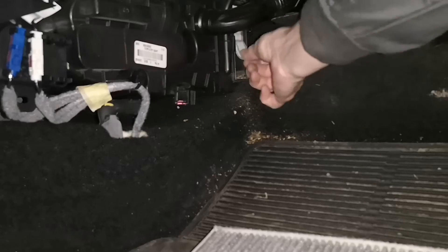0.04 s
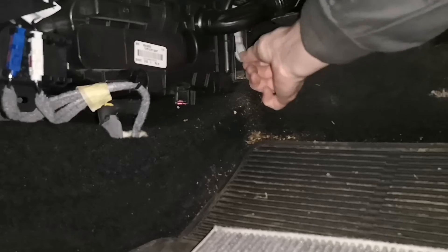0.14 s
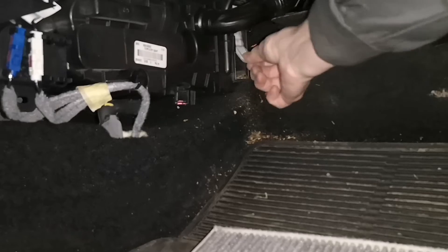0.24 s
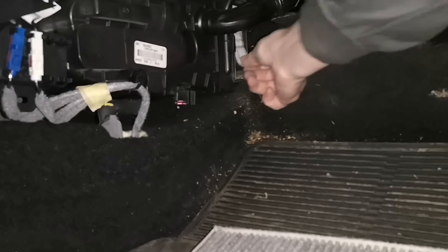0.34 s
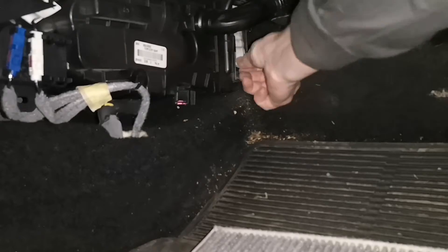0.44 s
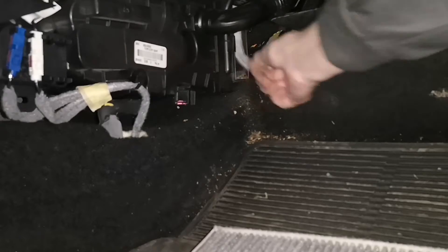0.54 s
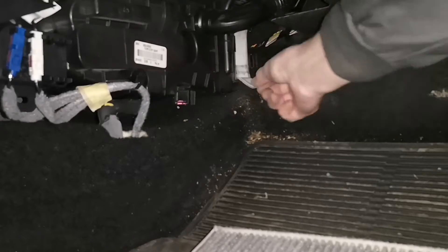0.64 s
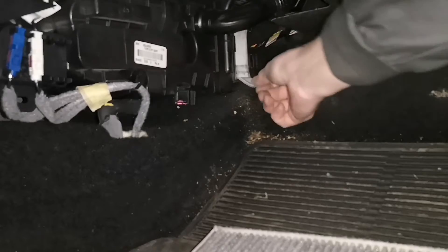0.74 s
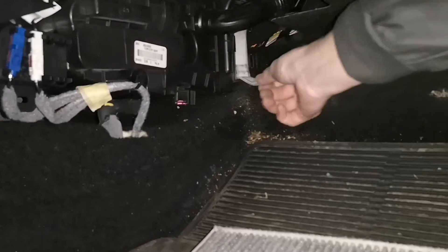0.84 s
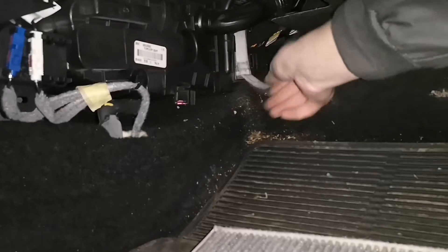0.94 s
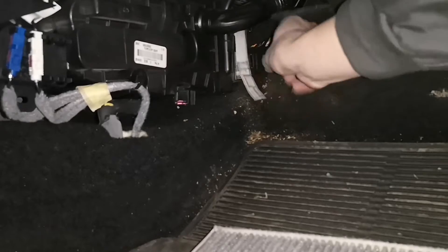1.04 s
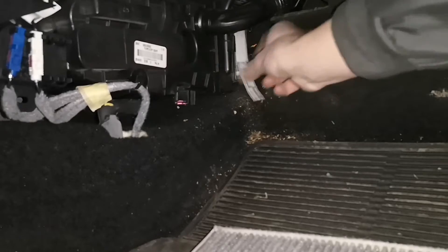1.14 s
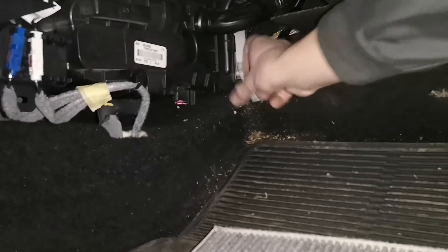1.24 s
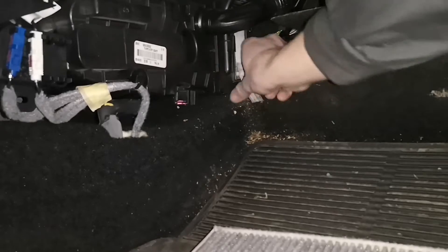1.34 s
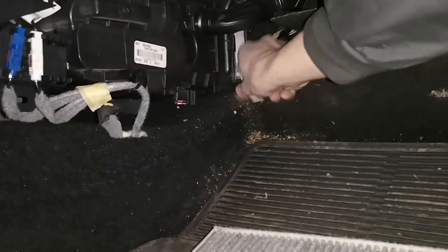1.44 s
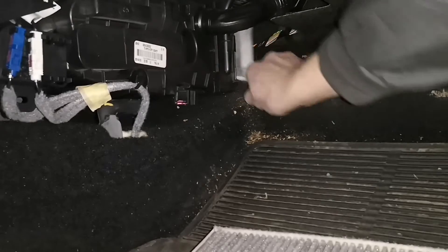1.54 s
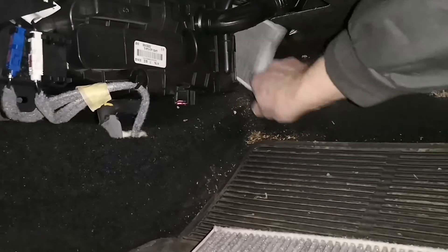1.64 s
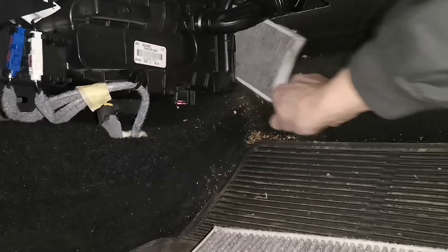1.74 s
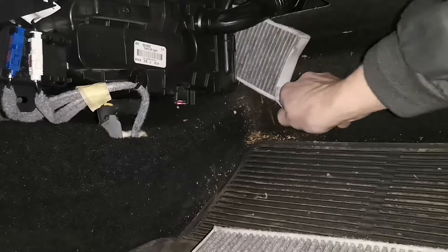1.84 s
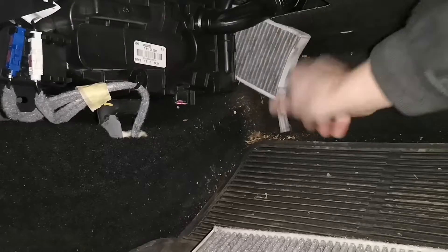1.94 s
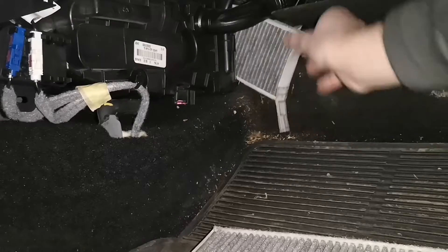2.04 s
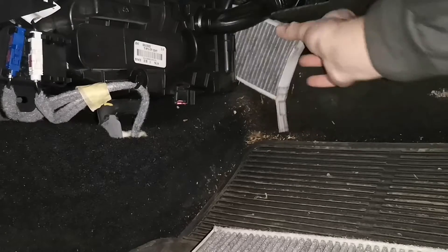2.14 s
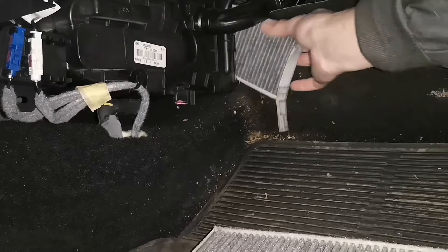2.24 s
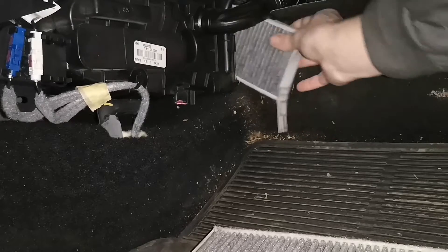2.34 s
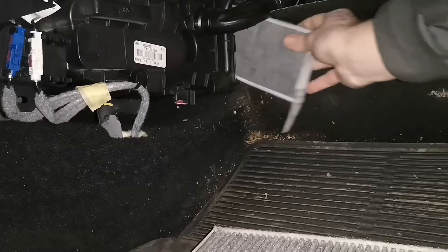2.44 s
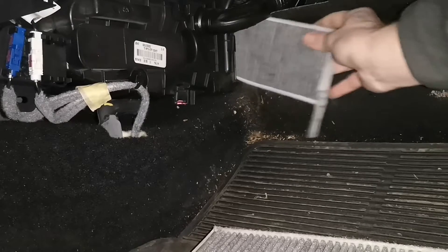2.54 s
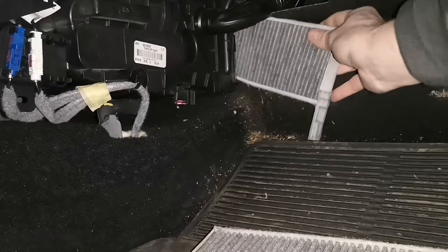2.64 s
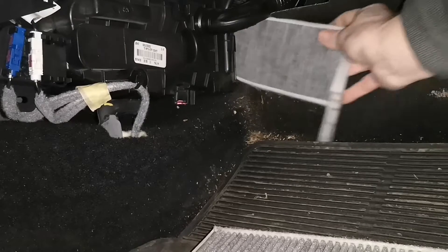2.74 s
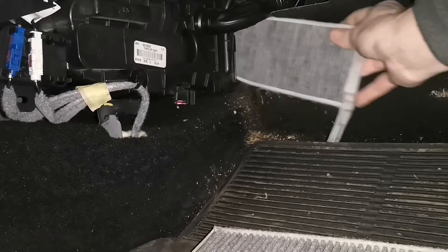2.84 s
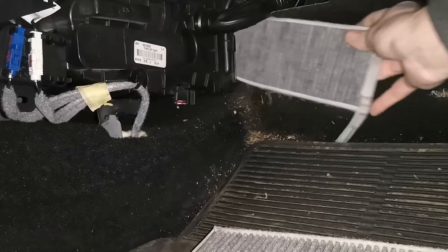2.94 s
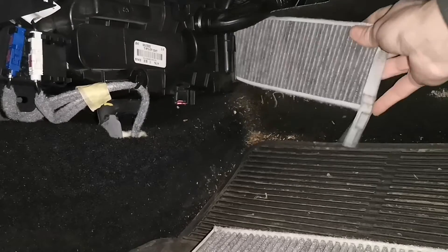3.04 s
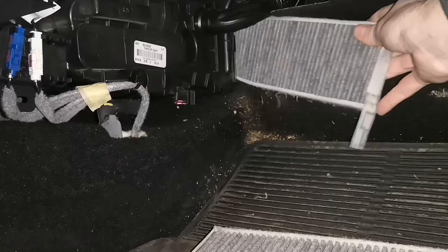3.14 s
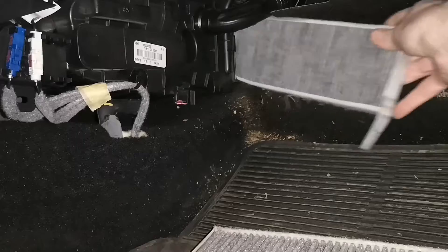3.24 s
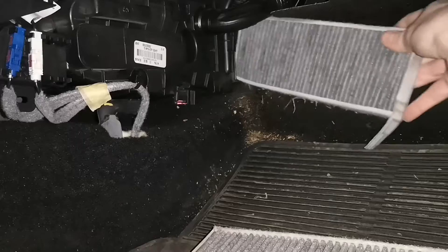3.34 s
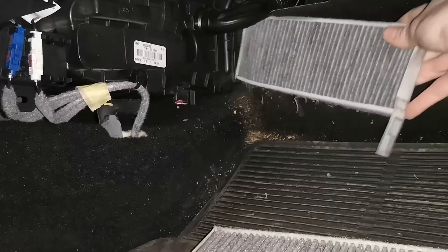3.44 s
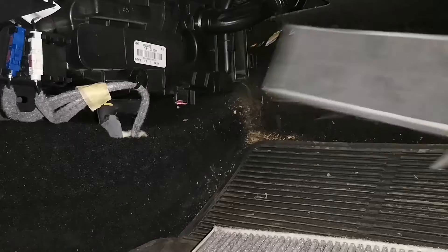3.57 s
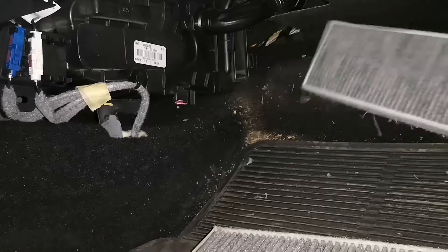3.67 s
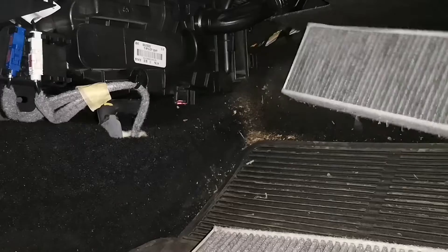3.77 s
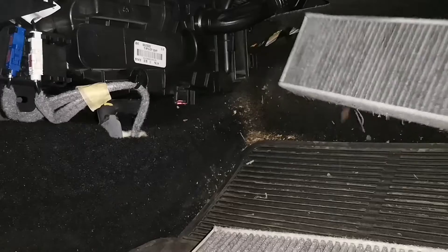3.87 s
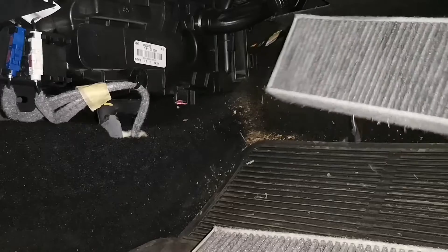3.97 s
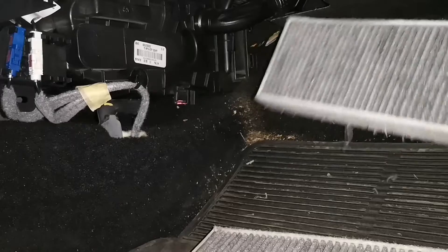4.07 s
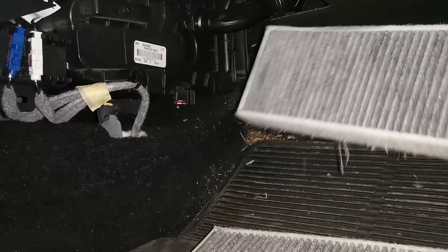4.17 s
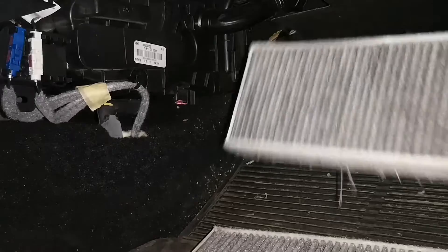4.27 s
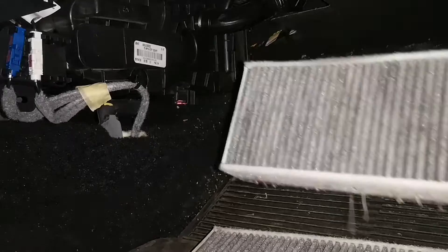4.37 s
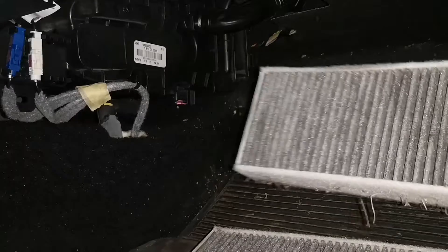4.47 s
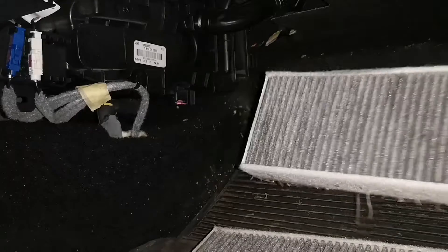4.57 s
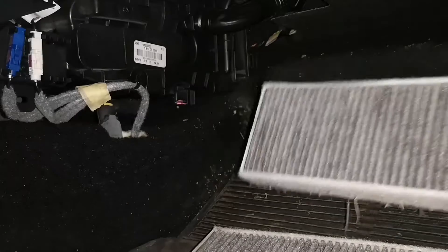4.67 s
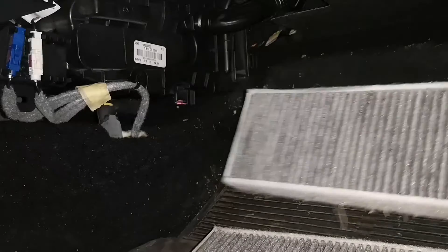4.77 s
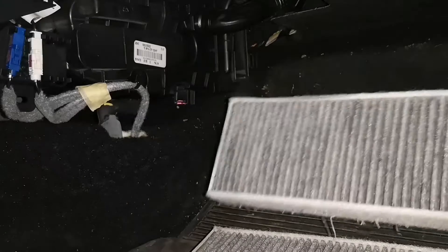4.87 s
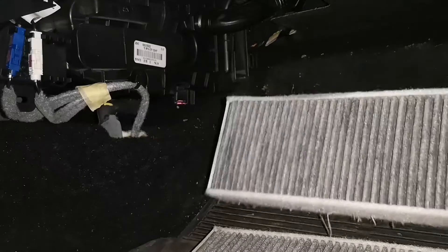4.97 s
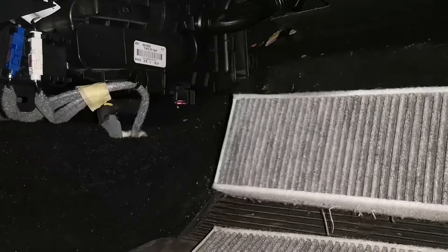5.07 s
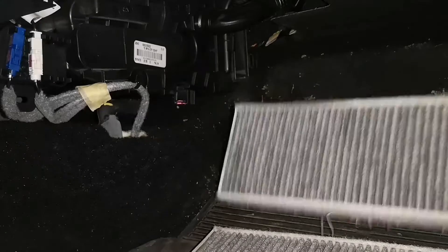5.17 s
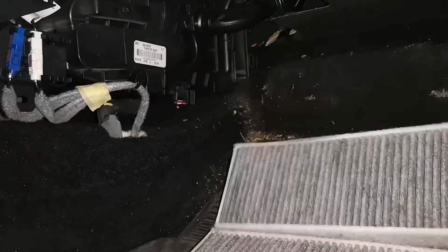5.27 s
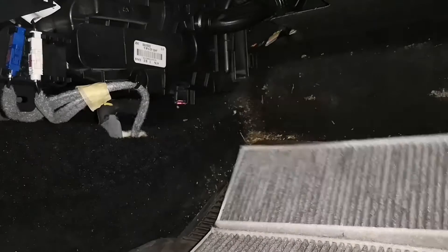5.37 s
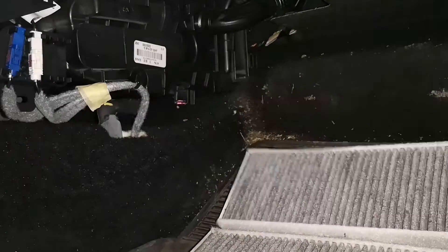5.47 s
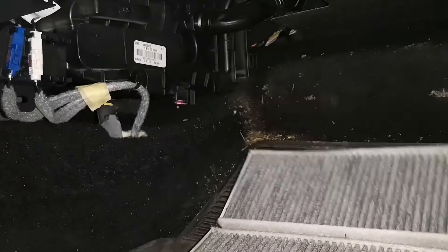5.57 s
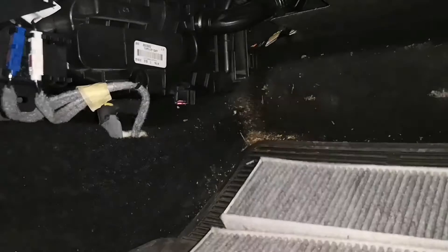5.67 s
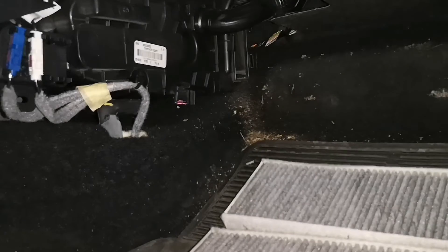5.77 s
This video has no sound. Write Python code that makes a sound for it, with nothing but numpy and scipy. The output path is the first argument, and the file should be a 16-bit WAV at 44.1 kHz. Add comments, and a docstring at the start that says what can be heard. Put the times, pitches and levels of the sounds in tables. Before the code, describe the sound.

Close up in a cramped car footwell, a hand tugs a pleated filter from a plastic slot: short scratchy rasps, a sharp cluster of clicks, then longer hissing, drumming scrapes. The frame pops free with a low thump, the sleeve swishes quietly, and the filter settles softly on a rubber mat.

```python
"""The listener first hears a pleated cabin filter rasp and tick as it is tugged from its plastic housing
in a car footwell; it is then laid on the rubber mat. Fibres stick and slip on the slot: these impulses
excite the housing's modes and hiss in the pleats. The frame bumps, snaps free and squeaks.
A sleeve swishes as the arm moves, over the faint noise of the parked car.
A close phone with two ports hears it all with the short, dense reflections of the footwell."""
import sys
import numpy as np
from scipy import signal
from scipy.fft import rfft, irfft
from scipy.io import wavfile
from scipy.ndimage import uniform_filter1d

SR = 44100
rng = np.random.default_rng(int(sys.argv[2]) if len(sys.argv) > 2 else 0)


def to_wav(sig):
    """Store sig (one row per channel, or 1-D mono) as 16-bit WAV at the path in sys.argv[1].

    Samples outside -1..1 are clipped; the rate is SR.
    """
    pcm = np.clip(np.atleast_2d(sig), -1, 1) * 32767
    pcm = np.round(pcm).astype(np.int16)
    wavfile.write(sys.argv[1], SR, pcm.T)  # frames by channels


N = 256220
TIME = np.arange(N) / SR  # s

# where the filter bears on the slot: t/s, f/Hz of the strongest ring, pleat drumming re rasp/dB
CONTACT_PATH = [(.7, 1130, -3.5), (1.3, 2020, -13.5), (1.6, 1900, 5), (1.85, 1400, 5), (2.7, 1560, 4.5),
                (3.25, 1620, 6.5), (3.44, 1480, -0.5), (3.8, 1920, -7), (5.3, 1750, -5)]
# spectral outline of the drumming pleats: f/Hz, relative level/dB
DRUM_SPECTRUM = [(130, -25.5), (300, 7.5), (560, 7.5), (850, -3.5), (1800, -58.5)]
# spectral outline of the hissing pleats: f/Hz, relative level/dB
PLEAT_SPECTRUM = [(400, -17.5), (1000, -12.5), (2200, -5), (3400, -8), (4300, -5), (6000, -5), (7900, -5),
                  (8800, -10.5), (11000, -12.5), (15000, -25.5)]
# spectral outline of the handling rumble: f/Hz, relative level/dB
RUMBLE_SPECTRUM = [(15, -8), (30, 0.5), (75, 4.5), (200, -9.5), (300, -23), (500, -32.5), (1500, -70.5)]


def rubbing(count=3):
    """Stick-slip friction: pleats catching at a few shifting spots of the slot rasp, hiss and drum."""
    rasp_gain, hiss_gain, rumble_gain = pulls()
    contact_hz, drum_db = curves(CONTACT_PATH)
    catch = walk(rate=67)
    # passing pleats catch densely; the bare frame crackles coarsely
    density = undb(np.minimum(drum_db, 0))
    rumble = unit(colour(slips(rate=1700, spread_db=3.0), RUMBLE_SPECTRUM))
    out = footwell(rumble * rumble_gain)
    for share in spots(count):
        edge = slips(rate=330 * density, spread_db=4.5) / np.sqrt(density)  # equal power at any density
        spot_hz = contact_hz * 2 ** (.35 * walk(rate=30))
        rasp = unit(housing(edge, spot_hz)) * rasp_gain * undb(2 * catch)
        drum = unit(colour(edge, DRUM_SPECTRUM)) * rasp_gain * undb(drum_db + 2.5 * catch)
        fibres = slips(rate=1600, spread_db=3.5)
        hiss = unit(colour(fibres, PLEAT_SPECTRUM)) * hiss_gain * undb(1.86 * catch)
        out = out + footwell(share * (rasp + drum + hiss))
    return out


# scrapes on the slot, the last on the mat: t/s, length/s, frame rasp level/dB, pleat hiss level/dB,
# rumble level/dB, growth over the stroke/dB
SCRAPE_STROKES = [(0.089, 0.086, -44.5, -49, -39.5, -1.5), (0.282, 0.055, -53, -66, -48, 19.5),
                  (0.329, 0.11, -57, -61, -42, -1.5), (0.486, 0.078, -49.5, -52, -45.5, 4.5),
                  (0.622, 0.046, -47.5, -50, -42, 8), (0.66, 0.098, -38.5, -46, -25.5, 5),
                  (1.233, 0.33, -62, -55.5, -45.5, -4), (1.475, 0.33, -57, -51, -45, 8.5),
                  (1.56, 0.056, -72, -43.5, -66, 8), (1.758, 0.16, -48, -42.5, -30, -1),
                  (2.135, 0.22, -59, -55, -35.5, 2), (2.495, 0.21, -52, -43, -38, 8.5),
                  (2.696, 0.14, -54, -52, -39.5, -3), (2.822, 0.29, -49.5, -46.5, -41, -0.5),
                  (3.096, 0.33, -55.5, -59, -39.5, -5.5), (3.347, 0.092, -45.5, -49.5, -38.5, 10.5),
                  (3.458, 0.074, -46, -49, -37.5, -1.5), (3.566, 0.095, -51.5, -51.5, -34.5, 4),
                  (3.682, 0.19, -54, -51, -37, -8.5), (5.06, 0.21, -68, -70, -55.5, 8.5),
                  (5.233, 0.09, -55.5, -56, -55, 8.5), (5.326, 0.25, -57, -54.5, -45, -5.5)]


def pulls():
    """Superposition of powers: the overlapping scrapes give the gains of rasp, hiss and rumble."""
    power = np.zeros((3, N))
    for s, length, rasp_db, hiss_db, rumble_db, growth_db in SCRAPE_STROKES:
        drag = stroke(length, growth_db, SCRAPE_RELEASE_S + RELEASE_SHARE * length)
        shake = stroke(length, growth_db, RUMBLE_RELEASE_S + RELEASE_SHARE * length)
        gains = [undb(rasp_db) * drag, undb(hiss_db) * drag, undb(rumble_db) * shake]
        add(power, s, np.square(gains))
    return np.sqrt(power)


# a longer pull starts and ends more gently: fixed times in s plus shares of its length
SCRAPE_ATTACK_S, ATTACK_SHARE = 0.018, 0.16
SCRAPE_RELEASE_S, RUMBLE_RELEASE_S, RELEASE_SHARE = 0.012, 0.032, 0.13


def stroke(length, growth_db, release_s, size=32768):
    """Envelope of one pull: grip builds up, changes evenly in dB, then decays exponentially at the stop."""
    age = TIME[:size]
    attack_s = SCRAPE_ATTACK_S + ATTACK_SHARE * length
    grip = np.sin(np.pi / 2 * np.minimum(age / attack_s, 1)) ** 2
    growth = undb(growth_db * (np.minimum(age / length, 1) - .5))
    release = np.exp(-np.maximum(age - length, 0) / release_s)
    return grip * growth * release


# modes of the plastic housing before detuning and damping: f/Hz, width/Hz, relative level/dB
HOUSING_MODES = [(367, 36, 2.5), (506, 250, 6), (607, 110, 10.5), (1040, 453, 0), (1418, 175, 2.5),
                 (1730, 220, 1.5), (2220, 284, 3), (2505, 296, 5), (2910, 500, 1.5), (4840, 1630, -3.5)]


def housing(force, contact_hz, damping=1, octaves=0.73, detune=0.056):
    """Modal resonance: broad, damped modes ring most near the contact pitch, slightly shifted each time."""
    out = 0
    for k, (hz, width, db) in enumerate(HOUSING_MODES):
        hz = hz * np.exp(detune * rng.standard_normal())
        coupling = 1 / (1 + (np.log2(hz / contact_hz) / octaves) ** 2)
        resonance = signal.iirpeak(hz, hz / (width * damping), SR)
        sign = (-1) ** k  # neighbouring modes move in opposition
        out = out + sign * undb(db) * signal.lfilter(*resonance, force * coupling)
    return out


def slips(rate, spread_db):
    """Stick-slip as a random impulse train (rate per s): fibres let go with sizes spread in dB, capped."""
    happens = rng.random(N) < rate / SR
    size = undb(spread_db * np.minimum(rng.standard_normal(N), 2))
    return happens * size * rng.choice([-1, 1], N)


def spots(count, rate=4.084):
    """Load sharing: the contact wanders among a few spots whose powers always sum to one."""
    load = undb([6 * walk(rate) for _ in range(count)])
    return load / np.linalg.norm(load, axis=0)


# snaps and ticks of the frame: t/s, plastic knock level/dB, paper crack level/dB, burst decay/s,
# f/Hz of the strongest ring
FRAME_SNAPS = [(0.116, -45.5, -54.5, 0.0059, 1360), (.144, -51, -72, 0.0052, 1000),
               (0.7389, -41, -45, 0.0065, 900), (0.747, -40, -53, 0.0057, 1540),
               (0.7598, -36, -58, 0.0018, 1820), (0.7637, -35, -71, 0.0049, 970),
               (1.383, -53.5, -66, 0.0064, 630), (1.7766, -53, -57, 0.0039, 650),
               (1.7908, -57, -45.5, 0.0085, 900), (1.821, -49, -47.5, 0.006, 1250),
               (1.886, -46.5, -44, 0.0087, 1400), (3.2226, -50.5, -54, 0.0041, 890),
               (3.418, -45.5, -54, 0.012, 1270), (3.525, -46.5, -44, 0.0065, 2270),
               (3.583, -58.5, -45.5, 0.0045, 2120), (3.592, -46.5, -58, 0.0059, 640),
               (3.718, -49, -59.5, 0.0015, 2120), (3.816, -35.5, -45, 0.00092, 2960),
               (3.886, -44.5, -49.5, 0.0024, 1800), (3.9211, -45.5, -59, 0.0024, 1870),
               (5.0607, -69, -63.5, 0.003, 1480), (5.4186, -51, -65, 0.0033, 1000)]
# spectral outline of the cracking paper: f/Hz, relative level/dB
CRACK_SPECTRUM = [(1000, -41.5), (3000, 2.5), (5200, 7.5), (8000, 7), (10000, 1), (15000, -8.5)]


def snaps(body_db=-7.0, size=4096):
    """Impulsive release: an edge jumps free, knocks plastic, drums the pleats and cracks stiff paper."""
    out, t = np.zeros((2, N)), TIME[:size]
    for s, knock_db, crack_db, decay, hz in FRAME_SNAPS:
        burst = rng.choice([-1, 1], size) * np.exp(-t / max(decay, 1 / SR))
        burst[0] = 10  # the first slip is by far the largest
        ring = housing(burst, hz, damping=1.1, octaves=1)
        knock = unit(ring) + undb(body_db) * unit(colour(burst, DRUM_SPECTRUM))
        crack = unit(colour(burst, CRACK_SPECTRUM))
        snap = undb(knock_db) * knock + undb(crack_db) * crack
        # the edge faces the phone, so only the nearest panels answer
        add(out, s, footwell(snap, early_s=.0011, late_db=-26))
    return out


# the filter leaves the slot: t/s, share of the treble that escapes
EMERGENCE = [(1.2, 0.48), (1.55, 0.94)]


def slot(x, dull_hz=7500):
    """Low-pass enclosure: the housing holds back the treble while the filter is still inside."""
    dull = signal.sosfiltfilt(signal.butter(2, dull_hz, fs=SR, output="sos"), x)
    return dull + curves(EMERGENCE)[0] * (x - dull)


# soft bumps of hand and filter on housing and mat: t/s, envelope peak level/dB, f/Hz,
# cycles to the peak (few for a hard contact, more for a soft one)
PANEL_BUMPS = [(0.737, -16.5, 92, 1.4), (0.7808, -18.5, 67.6, 0.55), (1.233, -24, 161, 0.5),
               (1.349, -23, 72, 1), (1.836, -20, 99, 2.06), (1.949, -19.5, 88.2, 1.15),
               (2.194, -25, 285, 0.61), (2.218, -22.5, 173, 1.17), (2.35, -29.5, 158, 1.2),
               (2.865, -26.5, 78.5, 1.2), (3.22, -21.5, 114, 1.28), (3.591, -23, 113, 0.41),
               (3.661, -21, 98, 0.47), (3.669, -28, 182, 1.65), (3.686, -23, 103, 1.1),
               (3.794, -9, 179.6, 0.63), (3.884, -21, 155, 0.62), (3.918, -24, 164, 1.34),
               (5.374, -29.5, 151, 0.76), (5.419, -28.5, 135, 0.76), (5.436, -26, 71.5, 0.54),
               (5.732, -30, 153, 0.25), (5.791, -15, 112.8, 2.5)]
# spectral outline of the boom under the dashboard: f/Hz, relative level/dB
BOOM_SPECTRUM = [(25, -61), (70, 1), (180, 6.5), (300, -22), (550, -17.5), (900, -30), (2500, -85)]


def bumps(size=8192):
    """Transient panel response: a blow swings it a few cycles and builds a boom, weaker for low pitches."""
    out, t = np.zeros(N), TIME[:size]
    for s, db, hz, cycles in PANEL_BUMPS:
        age = t * hz / cycles  # 1 at the envelope's peak
        swing = -np.sin(2 * np.pi * hz * t) * (age * np.exp(1 - age)) ** 2
        puff = rng.standard_normal(size) * np.minimum(age, 1) * np.exp(-t / 0.016)
        boom = unit(colour(puff, BOOM_SPECTRUM))
        boom_gain = undb(-21.5) * min(hz / 175, 1) ** 2
        add(out, s, undb(db) * (swing + boom_gain * boom))
    return out


# dull taps of fingers and frame on plastic and rubber: t/s, level/dB, upper cutoff f/Hz
DULL_TAPS = [(0.504, -63, 860), (0.637, -60, 680), (.741, -35.5, 584), (1.244, -54, 560),
             (1.826, -43.5, 540), (2.474, -54, 684), (3.423, -40.5, 510), (3.661, -45.5, 556),
             (3.886, -46, 980), (3.921, -46.5, 800), (4.566, -71.5, 600), (4.629, -68.5, 580),
             (5.105, -64.5, 890), (5.233, -62, 720), (5.375, -51.5, 1000)]


def taps(low_hz=110, size=4096):
    """Padded impact: a yielding contact low-passes one push and its brief shudder, leaving no treble."""
    out = np.zeros(N)
    high_pass = signal.butter(2, low_hz, "high", fs=SR)
    for s, db, top_hz in DULL_TAPS:
        push = rng.standard_normal(size) * np.exp(-TIME[:size] / .006)
        push[0] = 14  # the push itself, ahead of its shudder
        tap = signal.sosfilt(signal.butter(4, top_hz, fs=SR, output="sos"), push)
        add(out, s, undb(db) * unit(signal.lfilter(*high_pass, tap)))
    return out


# fingers fumble on the soft frame: t/s of the firmest press, half length/s, level/dB, centre f/Hz
FINGER_FUMBLES = [(1.243, 0.035, -32, 160), (2.212, 0.019, -28.5, 220), (2.335, 0.066, -44, 158),
                  (4.042, 0.023, -45.5, 163)]


def fumbles(octaves=0.27, size=16384):
    """Band-limited stick-slip: fingertips stick and roll on the frame in a swell of uneven, low thuds."""
    out, t = np.zeros(N), TIME[:size] - size / SR / 2
    for s, half_length, db, hz in FINGER_FUMBLES:
        edges_hz = hz * 2 ** (octaves * np.array([-1, 1]))
        band = signal.butter(2, edges_hz, "band", fs=SR, output="sos")
        swell = np.exp(-(t / half_length) ** 2)
        thuds = signal.sosfilt(band, slips(rate=1300, spread_db=2.5)[:size]) * swell
        # give the thuds the energy of the swell
        add(out, s + t[0], undb(db) * thuds * np.linalg.norm(swell) / np.linalg.norm(thuds))
    return out


# squeaks of the sticking edge: t/s, length/s, f/Hz, width of each of two resonators/Hz, level/dB
EDGE_SQUEAKS = [(.341, .016, 8100, 500, -56), (.372, .11, 7750, 350, -69), (.644, .045, 2690, 340, -48),
                (3.426, .045, 1560, 380, -44.5), (5.617, .02, 1700, 260, -51),
                (5.634, .075, 1720, 150, -57)]


def squeaks():
    """Rough stick-slip: the edge catches, irregular slips ring one narrow resonance and fade to rest."""
    out = np.zeros(N)
    for s, length, hz, width, db in EDGE_SQUEAKS:
        grip = np.linspace(1, 0, int(length * SR))
        chatter = slips(rate=2500, spread_db=4)[:len(grip)] * grip
        chatter[0] = 4  # the first catch
        resonance = signal.iirpeak(hz, hz / width, SR)
        tone = signal.lfilter(*resonance, signal.lfilter(*resonance, chatter))
        add(out, s, undb(db) * unit(tone))
    return footwell(out, wet_db=-6)


# swishes as the arm moves: t/s of top speed, half length/s, cloth level/dB, rumble level/dB
ARM_SWISHES = [(0.817, 0.094, -58, -36), (0.986, 0.042, -60, -41), (1.105, 0.076, -51.5, -42),
               (2.097, 0.049, -56.5, -47), (2.43, 0.16, -59, -45.5), (4.04, 0.087, -65, -57),
               (4.18, 0.15, -58.5, -61), (4.865, 0.15, -65.5, -87), (5.767, 0.09, -57.5, -53.5)]
# spectral outline of the sleeve's cloth: f/Hz, relative level/dB
SLEEVE_SPECTRUM = [(150, -6), (400, -6), (750, -12), (1200, 0), (3000, 0), (4000, -6), (6000, -4.5),
                   (7900, -5), (8800, -8.5), (11000, -12.5), (15000, -27.5)]


def sleeve(count=5):
    """Friction noise: cloth slides at shifting folds and swells with arm speed, over a handling rumble."""
    power = np.zeros((2, N))
    for s, half_length, cloth_db, rumble_db in ARM_SWISHES:
        near = np.abs(TIME - s) < 3 * half_length
        swell = np.exp(-((TIME[near] - s) / half_length) ** 2)
        power[:, near] += np.outer(undb([cloth_db, rumble_db]), swell) ** 2
    rumble = unit(colour(slips(rate=500, spread_db=7.0), RUMBLE_SPECTRUM))
    out = footwell(rumble * np.sqrt(power[1]))
    speed_gain = np.sqrt(power[0]) * undb(walk(rate=14))  # uneven by about 1 dB
    for share in spots(count):
        cloth = unit(colour(slips(rate=1200, spread_db=8.0), SLEEVE_SPECTRUM))
        out = out + footwell(cloth * speed_gain * share, early_s=0.0061, wet_db=14.0)
    return out


# spectral outline of the parked car's background: f/Hz, relative level/dB
CABIN_SPECTRUM = [(25, -3.5), (100, -8), (250, -24), (700, -32.5), (1500, -23.5), (7500, -38), (15000, -47)]
CABIN_DB = -60  # rms level


def cabin(count=6):
    """Diffuse field: independent steady noises with scattered paths sum to a faint background all round."""
    noises = [colour(rng.standard_normal(N), CABIN_SPECTRUM) for _ in range(count)]
    return undb(CABIN_DB) * unit(sum(footwell(noise, wet_db=17.0) for noise in noises))


# lead of the left port over the right in phase: f/Hz, phase/rad
PORT_PHASE_LEAD = [(0, 0), (90, -.07), (180, -.3), (500, -1.25), (700, -2.8), (1050, -5.3), (1500, -5.9),
                   (2100, -5.2)]
# lead of the left port over the right in level: f/Hz, level/dB
PORT_LEVEL_LEAD = [(230, -0.5), (550, -3.5), (1300, -1), (4500, 0.5), (8000, 7.5), (12000, -8.5)]


def footwell(x, early_s=0.003, late_s=0.013, late_db=-18, wet_db=3, size=4096):
    """Scattering: panels scatter treble differently to each of two ports; long waves scatter little."""
    t, hz = TIME[:size], np.fft.rfftfreq(size, 1 / SR)
    phase = np.interp(hz, *np.transpose(PORT_PHASE_LEAD))
    lead_db = np.interp(hz, *np.transpose(PORT_LEVEL_LEAD))
    scatter = undb(wet_db) * hz ** 2 / (hz ** 2 + 650 ** 2)
    decay = np.exp(-t / early_s) + undb(late_db) * np.exp(-t / late_s)
    out = []
    for side in (1, -1):  # left, right
        echoes = rng.standard_normal(size) * decay
        paths = 1 + scatter * rfft(echoes) / np.linalg.norm(echoes)
        # scattering adds no energy
        paths = paths / np.sqrt(uniform_filter1d(np.abs(paths) ** 2, size=25))
        port = undb(side * lead_db / 2) * np.exp(side * 1j * phase / 2)
        response = np.fft.fftshift(irfft(paths * port))  # centred, to allow a lead
        out.append(signal.fftconvolve(x, response)[size // 2:size // 2 + len(x)])
    return np.array(out)


def colour(x, points, size=8192):
    """Minimum-phase filtering: a folded cepstrum makes the outline (f/Hz, level/dB) causal."""
    hz, db = np.transpose(points)
    bins_hz = np.fft.rfftfreq(size, 1 / SR)
    outline_db = np.interp(np.log(bins_hz + 1), np.log(hz), db)
    cepstrum = irfft(np.log(undb(outline_db)))
    cepstrum[1:size // 2] *= 2
    cepstrum[size // 2:] = 0
    return signal.fftconvolve(x, irfft(np.exp(rfft(cepstrum))))[:len(x)]


def walk(rate):
    """Slow random modulation: Gaussian knots, rate per second, joined by straight lines."""
    knots = rng.standard_normal(4096)
    return np.interp(TIME * rate, np.arange(len(knots)), knots)


def curves(table):
    """Linear interpolation in time of every column after t/s."""
    s, *columns = np.transpose(table)
    return [np.interp(TIME, s, c) for c in columns]


def undb(db):
    """Logarithmic level: decibels to amplitude gain."""
    return 10 ** (np.asarray(db) / 20)


def unit(x):
    """Effective value: scale to rms 1."""
    return x / np.sqrt(np.mean(x ** 2))


def add(track, s, x):
    """Linear superposition: mix x into the track from time s on."""
    i = min(max(int(s * SR), 0), N)
    track[..., i:i + x.shape[-1]] += x[..., :N - i]


def scene():
    """Superposition of all the handling and the background, heard in the footwell."""
    filter_in_slot = slot(rubbing() + snaps())
    contacts = footwell(bumps() + taps() + fumbles())
    return filter_in_slot + contacts + squeaks() + sleeve() + cabin()


TOP_HZ = 15350


def record(dry):
    """Band limitation: the phone cuts the top with a steep elliptic low-pass."""
    return signal.sosfilt(signal.ellip(8, .2, 70, TOP_HZ, fs=SR, output="sos"), dry)


dry = scene()
out = record(dry)
to_wav(out)
```